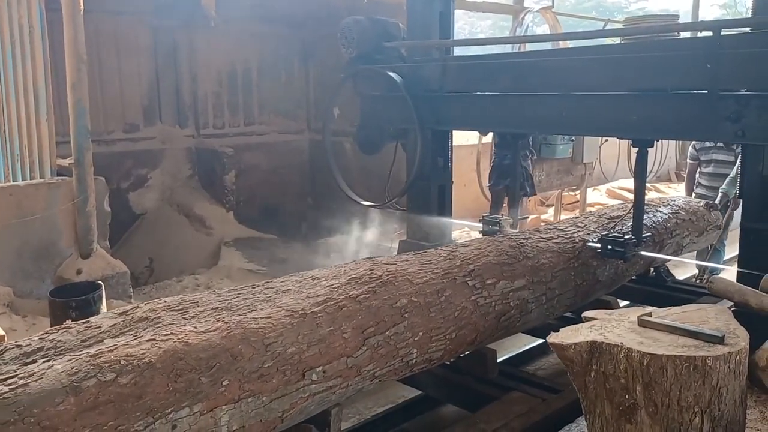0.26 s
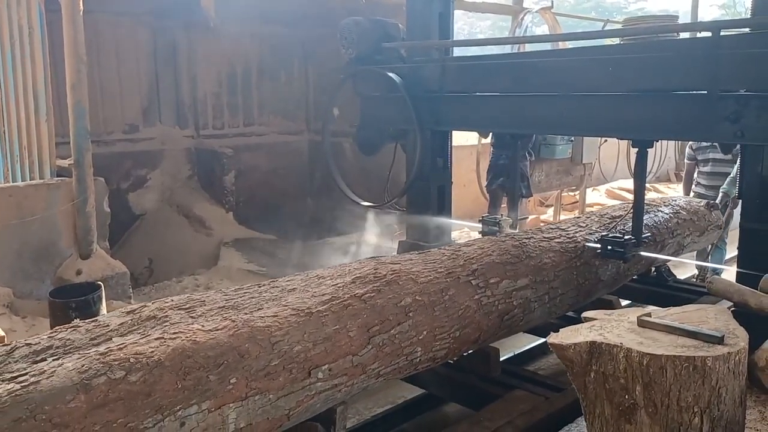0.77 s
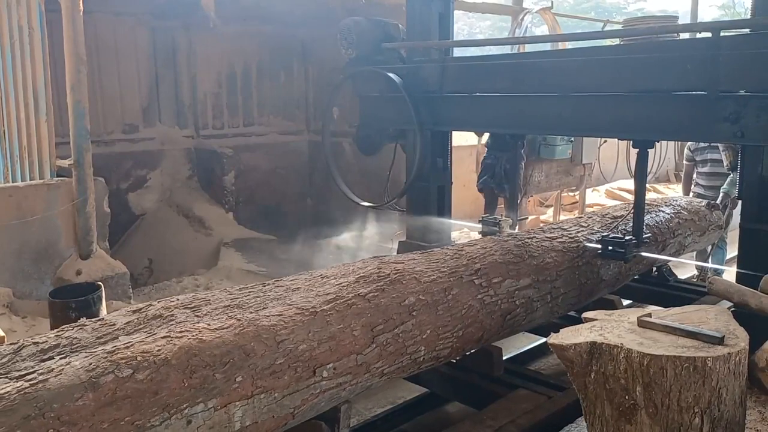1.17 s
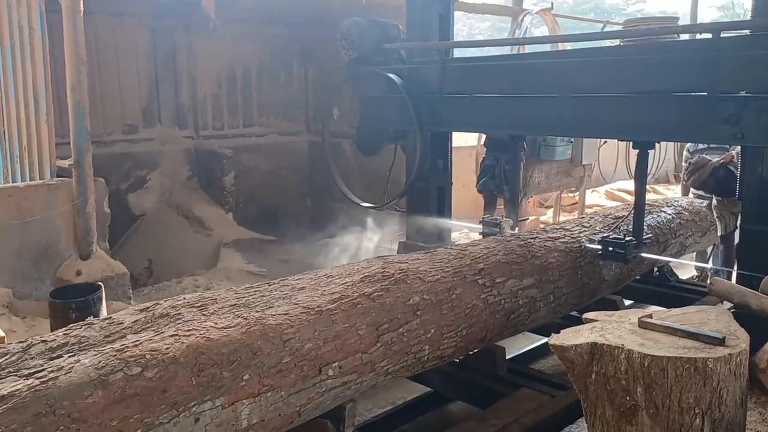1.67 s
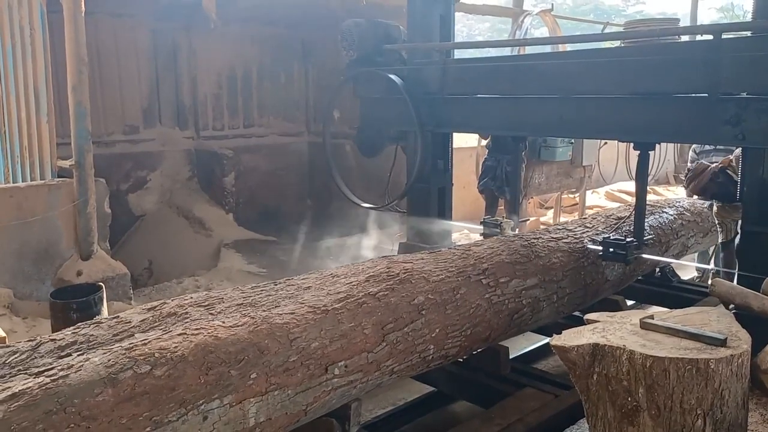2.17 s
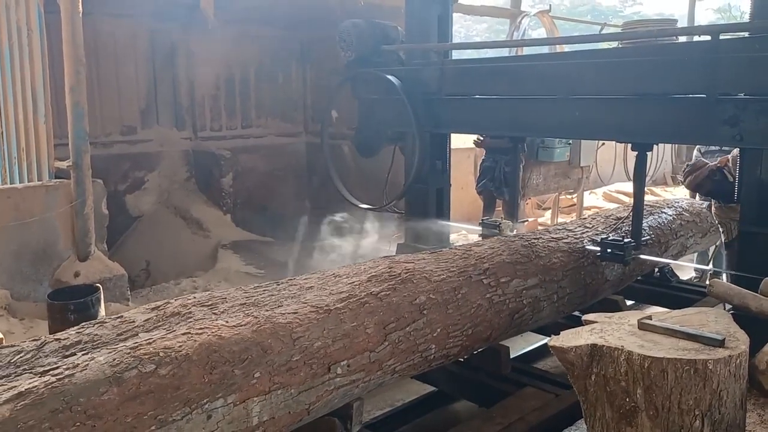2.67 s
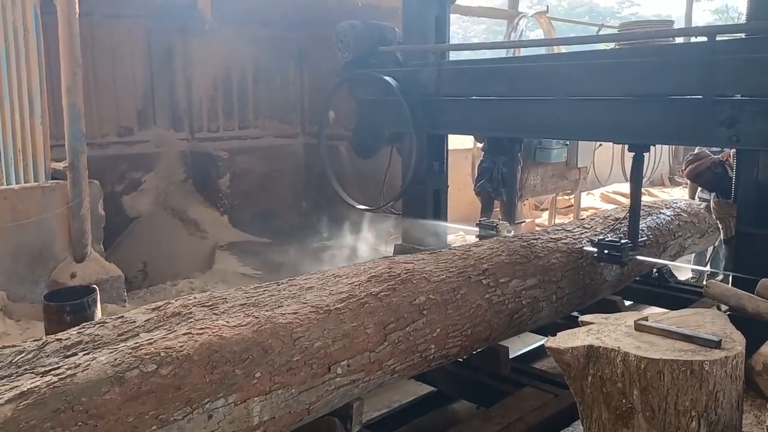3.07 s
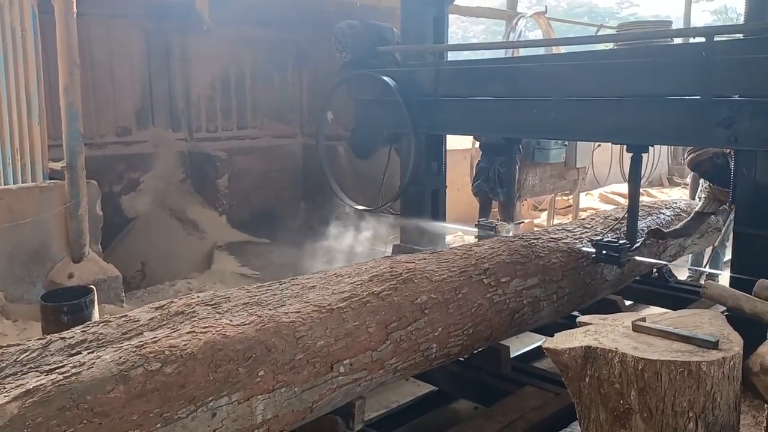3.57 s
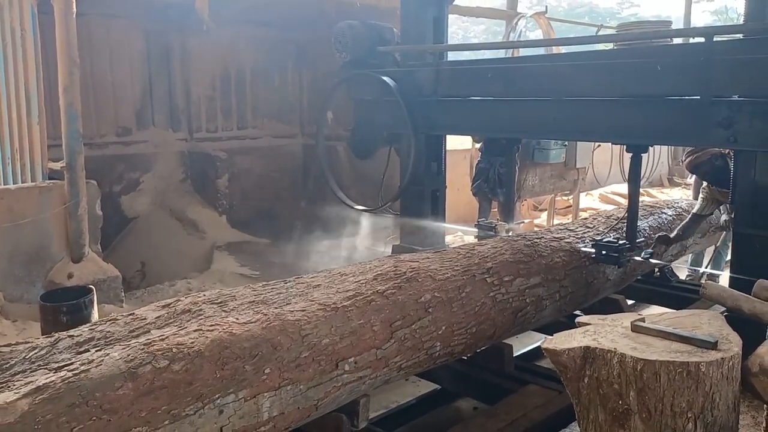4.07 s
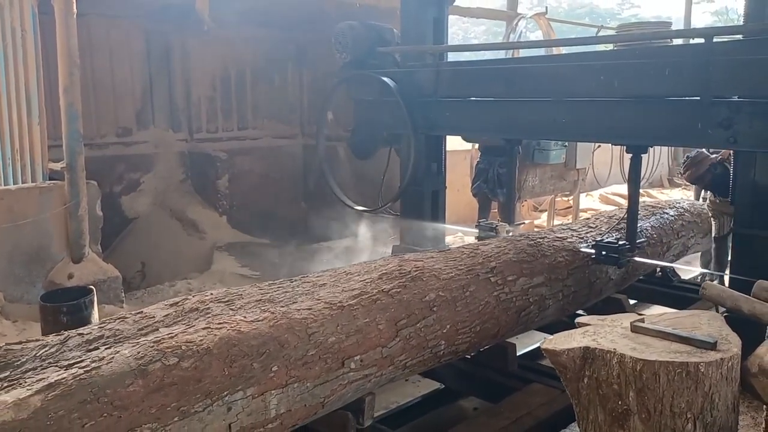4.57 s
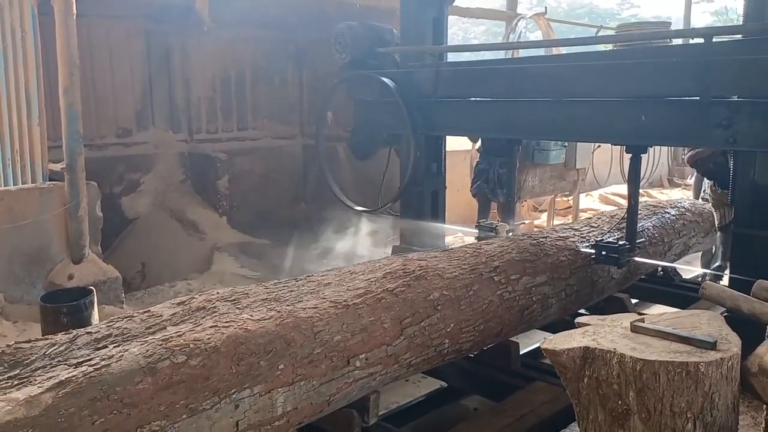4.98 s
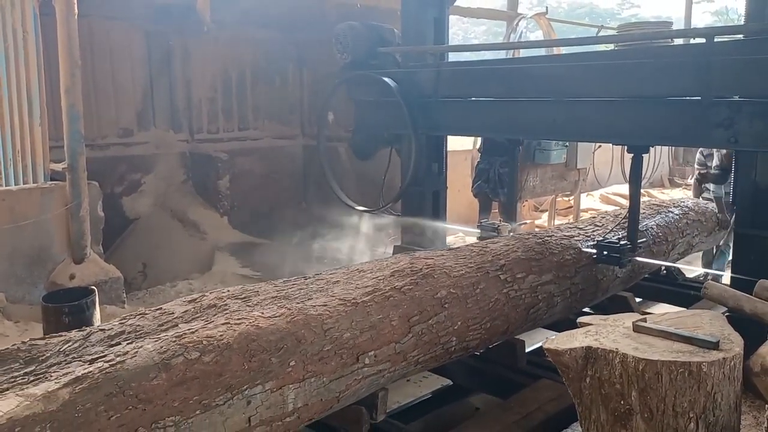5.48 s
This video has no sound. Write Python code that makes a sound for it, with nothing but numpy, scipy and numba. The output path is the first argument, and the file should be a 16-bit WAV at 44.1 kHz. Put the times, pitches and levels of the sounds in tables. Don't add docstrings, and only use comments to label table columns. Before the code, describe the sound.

A large band saw rips lengthwise through a log in an open shed, heard close in uneven stereo: the right is bright and exposed, the left covered, dull and mostly hum. From the start a dense, sizzling tooth hiss and a thin, very high metallic ring sit over low motor rumble, a mid-pitched gear whine and guide clatter. Over the first second or so a lower blade ring and the lower hiss build. The ringing wavers and dips about every 0.3 seconds as the band goes round. Between 0.2 and 3.7 seconds, irregular soft thuds and gusts of dusty air buffet the right microphone. Around 3.8 seconds the heavy cut eases: the ringing falls quickly and the buffeting stops. Hum, gears and clatter then swell as the level rises, the guides sing more clearly, a roller squeals briefly at about 5 seconds, and the machine is still running loudly at the end.

```python
import sys
import numpy as np
from scipy import signal
from scipy.fft import rfft, irfft, next_fast_len
from scipy.io import wavfile
from scipy.ndimage import uniform_filter1d
from numba import njit

SR = 44100
rng = np.random.default_rng(int(sys.argv[2]) if len(sys.argv) > 2 else 0)


def digitize_waveform(pressure):
    field = np.atleast_2d(pressure).T
    bounded = np.clip(field, -1, 1)
    quanta = np.round(bounded * 32767).astype(np.int16)
    wavfile.write(sys.argv[1], SR, quanta)


def gain_from_db(level_db):
    decades = np.asarray(level_db, float) / 20
    return 10 ** decades


N = 253121
T = np.arange(N) / SR
CUT_END_S = 3.78


def unit(x):
    return x / np.sqrt(np.mean(x[-1] ** 2))


def bump(x, at, wide):
    return np.exp(-((x - at) / wide) ** 2)


def walk(rate_hz):
    hold = int(SR / rate_hz)
    steps = np.repeat(rng.standard_normal(N // hold + 1), hold)
    slewed = uniform_filter1d(uniform_filter1d(steps, hold), hold)
    return 1.42 * slewed[:N]


def pair(alike):
    mid, side = rng.standard_normal((2, N))
    alike = np.clip(alike, 0, 1)
    return np.sqrt((1 + alike) / 2) * mid + np.sqrt((1 - alike) / 2) * side * np.array([[1], [-1]])


def colour(x, points, lag_s=0):
    size = next_fast_len(N)
    hz = np.arange(size // 2 + 1) * SR / size
    points_hz, points_db = np.transpose(points)
    gain = gain_from_db(np.interp(np.log(hz + 1), np.log(points_hz), points_db))
    delay = np.exp(-2j * np.pi * hz * lag_s)
    return irfft(rfft(x, size) * gain * delay, size)[..., :N]


@njit
def svf(x, hz, width_hz):
    y, band, low = np.empty(len(x)), 0., 0.
    for i in range(len(x)):
        g, k = np.tan(np.pi * hz[i] / SR), width_hz / hz[i]
        v = (band + g * (x[i] - low)) / (1 + g * (g + k))
        band, low, y[i] = 2 * v - band, low + 2 * g * v, k * v
    return y


def resonate(modes, alike, sway, flicker_db, steady=0):
    out = 0
    for hz, width_hz, db, sway_hz in modes:
        centre_hz = hz + sway_hz * sway
        pass_hz = 1.55 * width_hz
        rung = unit(np.array([svf(svf(x, centre_hz, pass_hz), centre_hz, pass_hz) for x in pair(alike)]))
        size = np.sqrt(uniform_filter1d(rung ** 2, int(0.3 * SR / width_hz)) + 0.28)
        out = out + gain_from_db(db + flicker_db * walk(9)) * rung / size ** steady
    return out


# time in s, recorder gain in dB, tooth bite in dB, gear load in dB.
DRIVE = [(0.0, 1, 1.5, -3.5), (0.32, -0.5, .5, 2), (0.64, 0, 0, 6), (1.0, 0.5, -1.5, 4),
         (1.45, 0, -1, -3.5), (1.72, -1, -2, -4), (2.0, 0, -2.5, 0.5), (2.33, 0, -2.5, 1.5),
         (2.56, 1, -3.5, 0.5), (2.89, -0.5, -0.5, 0), (3.1, -0.5, 0, -4), (3.72, .5, 0, -2),
         (3.93, 4.5, 4, 0), (4.4, 5, 3, 2), (4.85, 5, -1.5, 3.5), (5.1, 7, 3, 2), (5.45, 9, 5, 0),
         (5.74, 9, 2, 0.5)]


def drive():
    s, *columns = np.transpose(DRIVE)
    return [np.interp(T, s, column) for column in columns]


# low ring at the weld strike in dB, its sag over the lap in dB,
# high ring slack in dB, dust gust in dB.
LAPS = [(-54, 12, -1, -55), (-43, -2, 3.5, -50), (-33.5, 7.5, 2.5, -45), (-38, -7, -0.5, -42),
        (-34.5, 1.5, 2, -42), (-33, 0, 1.5, -42), (-33, -0.5, 2.5, -37.5), (-36, -11.5, 7, -41),
        (-29, 6, 9, -41.5), (-26, 11.5, 8, -45), (-28, 11, 5, -52), (-29.5, 12, 5, -41),
        (-30, 13, 5.5, -35), (-27, 13, 2, -42)]


def laps():
    lap_s, lap_start_s, first_lap = 0.288, 2.72, -10
    turns = (T - lap_start_s) / lap_s
    row = np.clip(np.floor(turns).astype(int) - first_lap, 0, len(LAPS) - 1)
    return turns % 1, np.transpose(LAPS)[:, row]


def slackness(lap):
    return bump(lap, 0.72, 0.072)


# centre in Hz, width in Hz, level in dB, sway in Hz per lap.
HIGH_MODES = [(11356, 52, 1.5, 26.5), (11330, 66, 0.5, 83), (11260, 160, -3.5, 45), (11580, 560, -0.5, 14),
              (12060, 520, -5, 49)]
LOW_MODES = [(4520, 31, 2.6, 11)]
PARTNER_MODE = [(4635, 52, -40, 14)]
SIDE_MODES = [(4947, 170, -4, 8.6)]


def blade():
    lap, (strike_db, sag_db, slack_db, _) = laps()
    _, bite_db, _ = drive()
    sway = uniform_filter1d(2 * lap - 1, 1800) + 0.27 * walk(10)

    high_db = -17.5 + bite_db - slack_db * slackness(lap) + 0.66 * walk(14)
    high = gain_from_db(high_db) * resonate(HIGH_MODES, 0.14, sway, flicker_db=0.54, steady=0.3)

    strike_s = 0.033
    low_db = 6 + uniform_filter1d(strike_db - sag_db * lap, int(strike_s * SR)) + 1.6 * walk(24.8)
    low_db += 5.5 * bump(lap, 0.11, 0.041)
    low_db += 2.5 * bump(lap, 0.536, 0.056)
    low = gain_from_db(low_db) * resonate(LOW_MODES, 0.14, sway, flicker_db=1.5, steady=0.52)
    partner_db = 4.5 + 5.5 * bump(T, 0.78, 0.88) + 4.0 * walk(22.35)
    partner = gain_from_db(partner_db) * resonate(PARTNER_MODE, 0.27, sway, flicker_db=2.2, steady=0.34)

    side_db = -42.5 + 14.5 * np.clip(T / 1.2, 0, 1) + 3 * bump(T, 2.45, 0.32) + 2.0 * walk(12)
    side = gain_from_db(side_db) * resonate(SIDE_MODES, 0.2, sway, flicker_db=-0.5, steady=0.15)

    stop_s, stop_db_per_s, rest_db = 3.76, 230, -21.5
    fade_db = np.maximum(-stop_db_per_s * np.clip(T - stop_s, 0, 1), rest_db)
    return gain_from_db(fade_db) * (high + low + partner + side)


# frequency in Hz, level in dB per Hz.
UPPER = [(4410, -26), (7500, -35), (8600, -23.5), (10800, -7.5), (11200, 0), (12200, 4), (13400, 4),
         (14700, -9.5), (15700, -11)]
LOWER = [(2120, -57), (3600, -11.5), (4140, -11.5), (4340, -1), (5420, 1), (6000, -4), (6510, -2),
         (7360, -13.5), (8500, -18.5), (11000, -12), (18700, -120)]
# centre in Hz, width in Hz, level in dB, sway in Hz.
PLATE_MODES = [(11830, 99, -17, 14), (12450, 280, -15.5, 18), (13330, 200, -13, 20), (14300, 160, -23, 20)]


def teeth():
    lap, (_, _, slack_db, _) = laps()
    gain_db, bite_db, _ = drive()
    eased = np.clip((T - CUT_END_S + 0.046) / 0.2, 0, 1)
    filled = np.clip(T / 1.4, 0, 1)
    slack = (1 - eased) * slack_db * slackness(lap)

    upper_db = -17.5 + 0.15 * bite_db - 0.24 * slack + 0.71 * gain_db - 7.8 * eased
    upper_db += 0.27 * walk(6.6) + 1.1 * walk(24.94)
    plate = resonate(PLATE_MODES, 0.1, walk(2.94), flicker_db=1.0)
    upper = gain_from_db(upper_db) * (unit(colour(pair(0.072), UPPER)) + plate)

    lower_db = -29 + 2.5 * filled - 0.12 * slack + 1.135 * gain_db - 4.5 * eased
    lower_db += 0.3 * walk(8) + 0.95 * walk(20)
    lower = gain_from_db(lower_db) * unit(colour(pair(0.16), LOWER))
    return upper + lower


# frequency in Hz, level in dB per Hz.
RUMBLE = [(15, -67), (25, -37), (48, -44), (101, -6), (162, -7.5), (223, -0.5), (573, -16), (702, -11.5),
          (934, -17), (1110, -14), (1270, -25), (1400, -32), (1820, -57), (3080, -120)]
# centre in Hz, width in Hz, level in dB, sway in Hz.
FRAME_MODES = [(115.4, 14, -11.5, 0.73), (216.9, 34, -3, 0.98), (251.3, 44, -9.5, 3.3), (868, 15, -17, 1.4)]


def frame_hum(drift):
    gain_db, _, _ = drive()
    rumble = gain_from_db(1 + 1.18 * walk(6)) * unit(colour(pair(0.92), RUMBLE))
    hum = rumble + resonate(FRAME_MODES, 1.0, drift, flicker_db=2.0)
    return gain_from_db(-43 + 0.95 * gain_db) * hum


# centre in Hz, width in Hz, level in dB, sway in Hz.
GEAR_MODES = [(1016, 16, -1, 2.1), (1063, 8.2, -1, 2.6), (1128, 16, -1, 1.8), (1158, 37, -3, 2)]


def gears(drift):
    gain_db, _, load_db = drive()
    mesh = resonate(GEAR_MODES, 0.69, drift, flicker_db=3.0, steady=0.71)
    return gain_from_db(-53 + 1.16 * gain_db + load_db) * mesh


# frequency in Hz, level in dB per Hz.
CLATTER = [(650, -24), (1100, -8), (1170, -8.5), (1260, -13), (1400, -12.5), (1920, -6), (3180, -7.5),
           (3990, -16), (4400, -4), (5720, -18), (9680, -120)]
# centre in Hz, width in Hz, level in dB, sway in Hz.
CLATTER_MODES = [(1870, 11, -21.5, 2), (1928, 9.7, -13.5, 2.4), (2114, 15, -17, 1.7), (2801, 18, -17, 3),
                 (3815, 26, -15, 3.1)]
SQUEAL_MODE = [(2810, 24, -9, 3)]


def guides(drift):
    gain_db, _, _ = drive()
    clatter = gain_from_db(1.2 * walk(12) + 0.98 * walk(5.99)) * unit(colour(pair(0.18), CLATTER))
    eased = np.clip(0.36 + (T - CUT_END_S) / 2.5, 0.3, 1)
    singing = eased * resonate(CLATTER_MODES, 0.34, drift, flicker_db=5.0)
    squeal_s, squeal_wide_s = 5.03, 0.14
    squeal = resonate(SQUEAL_MODE, 0.3, drift, flicker_db=4.0, steady=0.4)
    squeal = bump(T, squeal_s, squeal_wide_s) * squeal
    return gain_from_db(-40 + 0.85 * gain_db) * (clatter + singing + squeal)


def machine():
    drift = walk(2.12)
    return frame_hum(drift) + gears(drift) + guides(drift)


# frequency in Hz, level in dB per Hz.
DRAUGHT = [(25, -37), (60, -6), (110, -1), (200, -9), (400, -16.5), (1000, -23), (2000, -37)]


def draught():
    lap, (*_, peak_db) = laps()
    gust_db = 6.5 + peak_db - 14.5 * (1 - bump(lap, 0.3, 0.11)) + 4.35 * walk(16)
    cutting = np.clip((CUT_END_S - T) / 0.042, 0, 1)
    return cutting * gain_from_db(gust_db) * unit(colour(rng.standard_normal((1, N)), DRAUGHT))[0]


# start in s, peak in dB, pitch in Hz, crack in dB.
PUFFS = [(0.211, -37, 219, -43.5), (0.489, -27, 297, -40), (0.695, -28, 118, -40), (0.738, -24, 213, -38),
         (0.771, -39, 250, -41), (0.788, -20.5, 198, -37), (0.95, -29, 124, -46), (1.025, -27, 135, -37),
         (1.053, -25.5, 131, -43), (1.06, -35, 170, -38), (1.123, -32, 91, -49), (1.316, -25, 111, -41),
         (1.361, -38, 200, -35), (1.594, -25, 91.5, -38), (1.623, -27, 216, -40), (1.643, -20, 219, -32.5),
         (1.924, -26, 104, -40), (2.132, -29, 283, -45), (2.225, -26, 112, -35), (2.525, -20.5, 140, -35),
         (3.08, -27, 210, -40), (3.293, -27, 135, -41), (3.365, -20, 135, -34), (3.381, -31, 124, -40),
         (3.408, -30, 224, -48), (3.543, -26, 127, -35), (3.641, -26, 138, -34), (3.655, -25, 127, -43),
         (3.717, -26, 234, -40)]


def puffs():
    out = np.zeros(N)
    age_s = np.arange(int(0.055 * SR)) / SR
    decay_cycles = 1.05
    for s, db, hz, crack_db in PUFFS:
        phase_s = age_s + 0.002 * (1 - np.exp(-age_s / 0.00095))
        swing = np.sin(2 * np.pi * hz * phase_s) * np.exp(-age_s * hz / decay_cycles)
        crack = uniform_filter1d(rng.standard_normal(len(age_s)), 5) * np.exp(-age_s / 0.0018)
        at = int((s + 0.00155) * SR)
        out[at:at + len(age_s)] += gain_from_db(db + 2.0) * swing + gain_from_db(crack_db + 19.5) * crack
    return out


# frequency in Hz, gain in dB.
COVER = [(30, 0), (300, -4), (1000, -3.5), (1400, -8), (2300, -23.5), (4400, -45), (7500, -97),
         (10000, -27.5), (12000, -72), (15000, -81)]


def scene():
    left, right = blade() + teeth() + machine()
    return np.array([colour(left, COVER, lag_s=0.00033), right + draught() + puffs()])


def band_limit(x):
    return signal.sosfilt(signal.butter(12, 15740, fs=SR, output="sos"), x)


def record(dry):
    bass_cut = signal.butter(2, 45, "high", fs=SR, output="sos")
    cut = signal.sosfilt(bass_cut, dry)
    return band_limit(np.tanh(0.8 * cut) / 0.77)


dry = scene()
out = record(dry)
digitize_waveform(out)
```